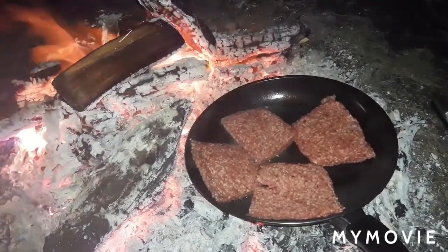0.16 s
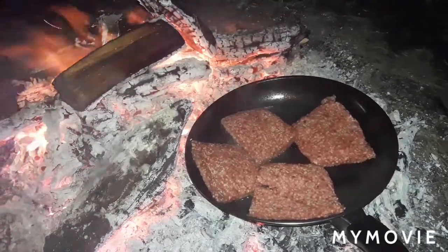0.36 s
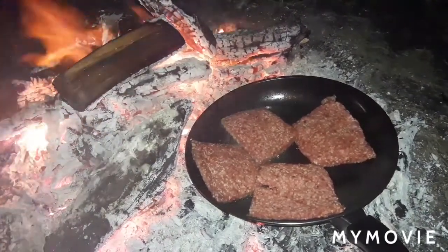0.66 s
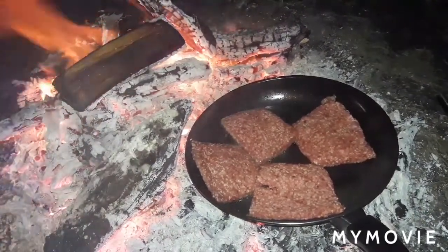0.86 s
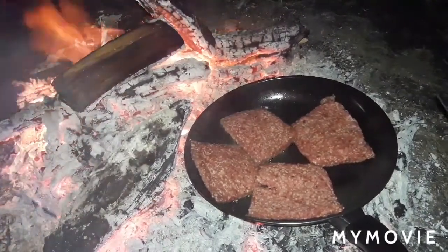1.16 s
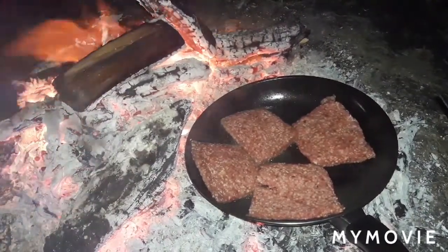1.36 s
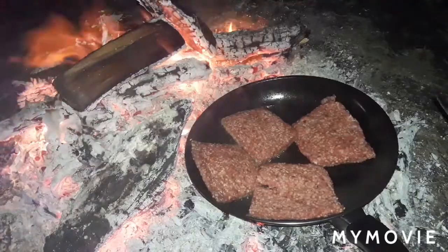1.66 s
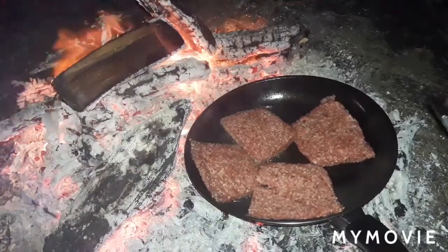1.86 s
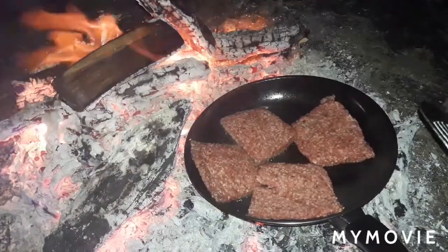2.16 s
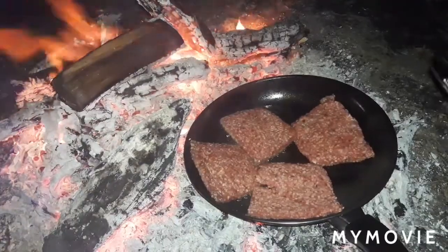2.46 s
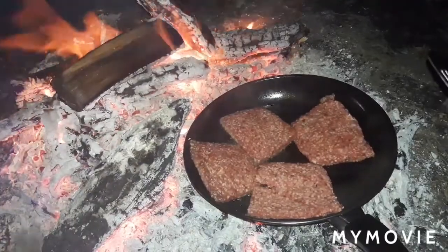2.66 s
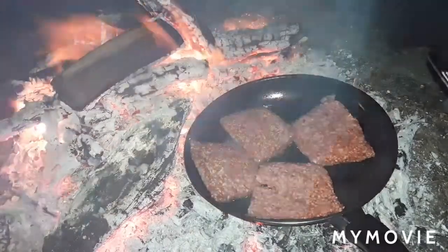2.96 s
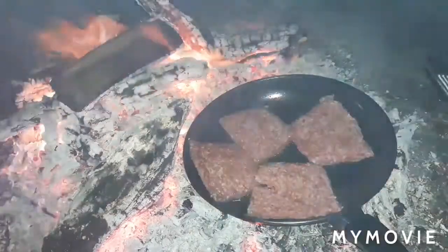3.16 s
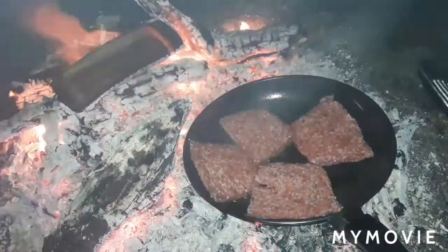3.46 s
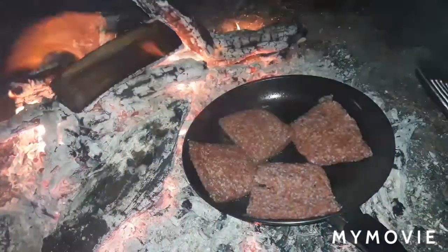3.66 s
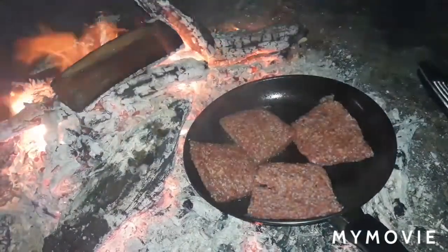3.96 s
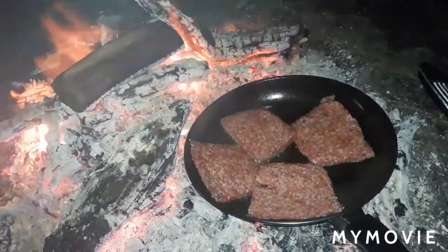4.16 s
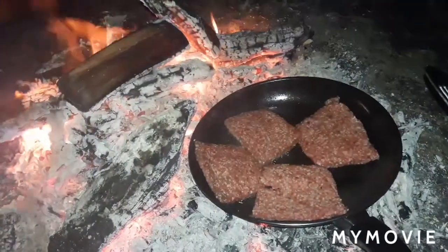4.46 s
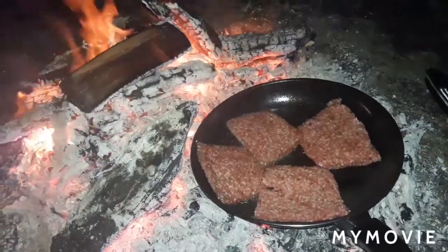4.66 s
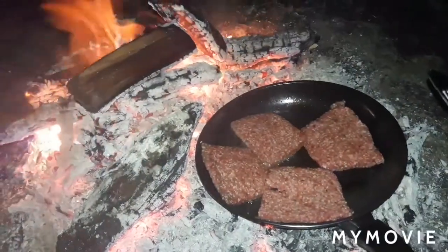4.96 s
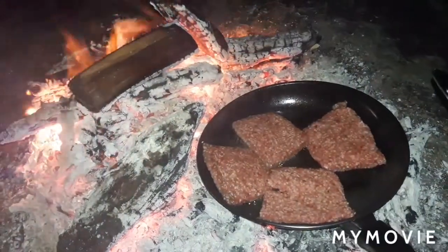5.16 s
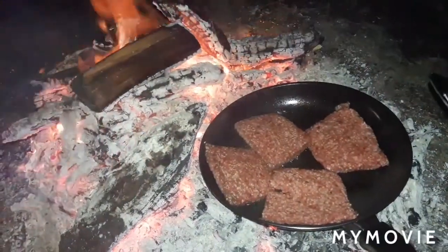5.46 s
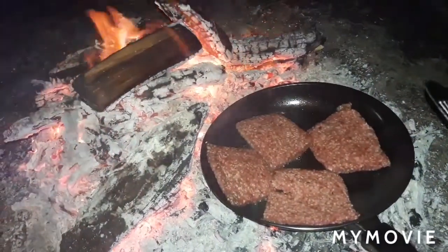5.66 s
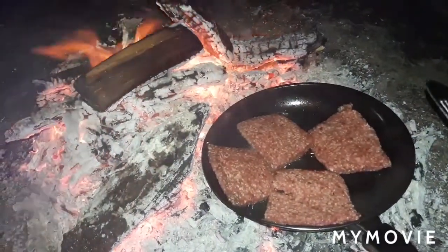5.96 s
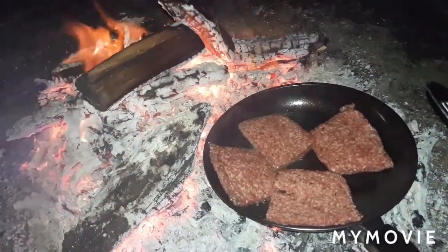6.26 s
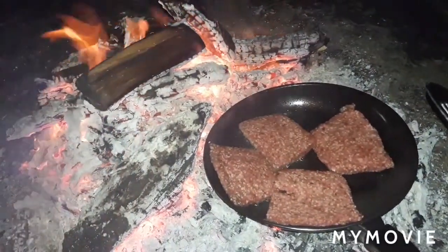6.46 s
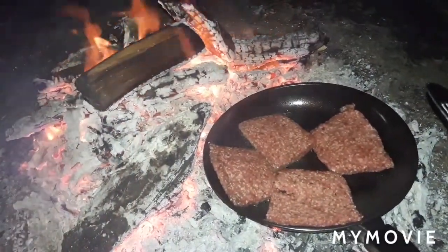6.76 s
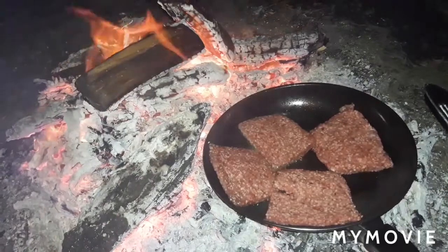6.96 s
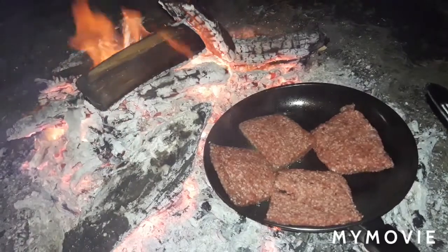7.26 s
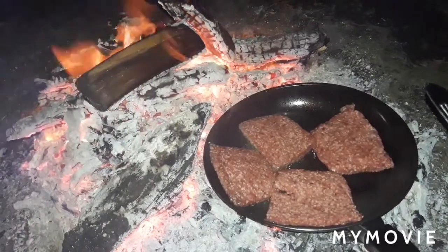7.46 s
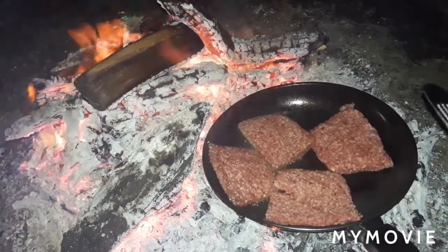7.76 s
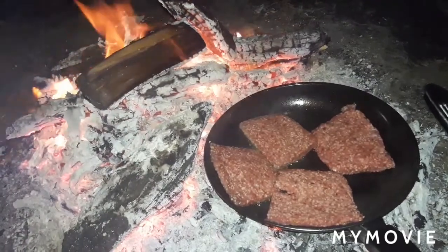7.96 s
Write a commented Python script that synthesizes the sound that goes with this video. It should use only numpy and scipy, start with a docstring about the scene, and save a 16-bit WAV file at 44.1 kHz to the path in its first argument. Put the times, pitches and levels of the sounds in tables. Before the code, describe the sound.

Meat slices sizzle in a pan on campfire embers, with sharp spitting pops and tiny ringing bubbles over a faint low rush of flames.

```python
"""Sharp spits and short rings: meat slices fry in a pan on campfire embers, close to a microphone.
Each steam bubble bursting in the fat is a noise snap (thud and spit) plus a rising sine, echoed by the pan.
Many small bursts and a fizz of patchy, gritty noise fill in behind.
Under them lie the rumble and soft rush of the flames, two bands of patchy noise; the bed's level drifts."""
import sys
import numpy as np
from scipy import signal
from scipy.fft import rfft, irfft, next_fast_len
from scipy.io import wavfile
from scipy.ndimage import uniform_filter1d

SR = 44100
rng = np.random.default_rng(int(sys.argv[2]) if len(sys.argv) > 2 else 0)


def dump(signal):
    """Clip the signal to [-1, 1] and save it as 16-bit WAV at the path in sys.argv[1]."""
    limited = np.clip(np.atleast_2d(signal).T, -1, 1)
    pcm = np.round(limited * 32767).astype(np.int16)
    wavfile.write(sys.argv[1], SR, pcm)


N = 357210


def amp(db):
    """Gain of a level in dB."""
    return 10 ** (np.asarray(db) / 20)


def unit(x):
    """x at rms 1."""
    return x / np.sqrt(np.mean(x ** 2) + 1e-20)


def along(points, hz):
    """Gain at hz, from (f/Hz, level/dB) points joined on a log-frequency axis."""
    f_hz, level_db = np.transpose(points)
    return amp(np.interp(np.log(hz + 1), np.log(f_hz + 1), level_db))


def filtered(x, response):
    """x times a zero-phase response of frequency."""
    size = next_fast_len(N + SR // 2)
    gain = response(np.fft.rfftfreq(size, 1 / SR))
    return irfft(rfft(x, size) * gain, size)[..., :N]


def causal(points, size=1024):
    """Minimum-phase impulse of this colour, envelope peak 1, by folding the cepstrum."""
    cepstrum = irfft(np.log(along(points, np.fft.rfftfreq(size, 1 / SR))))
    cepstrum[1:size // 2] *= 2
    cepstrum[size // 2 + 1:] = 0
    pulse = irfft(np.exp(rfft(cepstrum)))[:size // 2]
    return pulse / np.abs(signal.hilbert(pulse)).max()


def patchy(patchy_db):
    """White noise with time-frequency patches of random gain, patchy_db rms."""
    z = signal.stft(rng.standard_normal(N + 512), nperseg=512)[2]
    field = rng.standard_normal(z.shape)
    field = uniform_filter1d(field, size=8, axis=0)  # across frequency
    field = uniform_filter1d(field, size=10, axis=1)  # across time
    return signal.istft(z * amp(patchy_db * unit(field)), nperseg=512)[1][:N]


def laid(start_s, shapes):
    """Rows of short sounds summed at their times."""
    at = np.round(start_s * SR).astype(int)[:, None] + np.arange(shapes.shape[1])
    return np.bincount(at.ravel(), shapes.ravel(), N + SR)[:N]


# colour of the dull part of a snap: (f/Hz, relative level/dB)
THUD_COLOUR = [(400, -92.5), (1100, -2), (2200, -1), (4000, 9), (6500, 10.5), (8500, -105)]
# colour of the bright part of a snap: (f/Hz, relative level/dB)
SPIT_COLOUR = [(2500, -6), (5000, -14.5), (7300, 15.5), (8500, -1.5), (10000, 5), (12000, 9), (15500, 9.5),
               (16100, -73), (16800, -8)]


def bursts(start_s, ring_db, hz, thud_db, spit_db):
    """Each bubble snaps (a dull thud and a bright spit) and rings, its pitch rising as the film opens."""
    t = np.arange(SR // 50) / SR
    chance = rng.standard_normal((len(start_s), len(t) + 1))
    noise = chance[:, 1:]

    cycles = hz[:, None] * t
    wet = 1 / (1 + amp(spit_db - ring_db + 14.5))[:, None]  # 0 dry snap, 1 bubble deep in fat
    crest_cycles = (0.93 + 4.08 * wet) * amp(2.0 * chance[:, :1])  # wet bubbles bloom late and last
    bloom = cycles / crest_cycles * np.exp(1 - cycles / crest_cycles)
    wobble = 0.22 * np.cumsum(noise, axis=1)  # the cavity wobbles
    phase = 2 * np.pi * cycles * (1 + 12 * t) + wobble
    overtone = 0.24 * np.sin(2 * phase) * (hz[:, None] < 4200)  # big bubbles only
    tone = np.sin(phase) + overtone

    tear = amp(-60 * t / 0.0013)  # the film tears: -60 dB in 1.3 ms
    spray = amp(-9 + 3 * chance[:, -1:] - 60 * t / 0.01)  # weaker, -60 dB in 10 ms
    snap = noise * (tear + spray)
    snap[:, 0] = 5  # a sharp pressure step leads
    snap = snap / np.linalg.norm(snap, axis=1, keepdims=True)

    ring = laid(start_s, amp(ring_db)[:, None] * bloom * tone)
    thud = signal.fftconvolve(laid(start_s, amp(thud_db)[:, None] * snap), causal(THUD_COLOUR))
    spit = signal.fftconvolve(laid(start_s, amp(spit_db)[:, None] * snap), causal(SPIT_COLOUR))
    return ring + (thud + spit)[:N]


# echoes off the pan wall: (delay/s, level/dB)
RIM_ECHOES = [(.0009, -38), (.002, -22.5), (.0033, -18), (.005, -20.5)]


def pan(x):
    """The pan wall returns a few weak delayed copies."""
    echoes = [amp(db) * np.pad(x, (round(delay_s * SR), 0))[:N] for delay_s, db in RIM_ECHOES]
    return x + sum(echoes)


# loudest bursting bubbles: (t/s, ring level/dB, ring onset f/Hz, thud level/dB, spit level/dB)
LOUD_BUBBLES = [(0.0678, -26, 5300, -34, -19.5), (0.1207, -35, 2860, -25, -27),
                (0.1309, -27, 4930, -24, -21), (0.1911, -18, 6800, -31, -21), (0.201, -24, 6590, -37, -20),
                (0.2661, -16.5, 4720, -20, -19), (0.3538, -35, 7000, -39, -20),
                (0.4367, -35.5, 2950, -30, -40), (0.4429, -31, 4520, -46, -19.5),
                (0.5003, -30.5, 7140, -32, -26), (0.5191, -40, 6780, -40, -22.5),
                (0.533, -33.5, 2100, -27, -23.5), (0.6084, -33.5, 2880, -29, -25),
                (0.6569, -16.5, 6030, -38, -9.5), (0.701, -28, 7260, -34, -22),
                (0.7059, -36, 4000, -28, -39), (0.7409, -33, 3960, -23.5, -15.5),
                (0.7654, -34, 4840, -25, -43), (0.7692, -28.5, 4900, -36, -42),
                (0.9167, -42, 5280, -32, -29), (0.9546, -32, 5000, -43, -27),
                (0.991, -21.5, 4510, -43, -33), (1.0274, -36, 2110, -28, -31),
                (1.1133, -31.5, 5500, -41, -34), (1.1391, -29, 6030, -29, -32),
                (1.146, -43, 5400, -39, -31), (1.1514, -42, 4630, -41, -24),
                (1.1738, -29, 4200, -25.5, -29), (1.1956, -35.5, 4400, -34, -49),
                (1.2466, -42, 5280, -42, -25), (1.272, -39, 4970, -30.5, -29), (1.298, -36, 4000, -32, -27),
                (1.3153, -38, 4000, -29, -39), (1.3306, -32, 7000, -45, -44), (1.443, -42, 6630, -42, -28),
                (1.5646, -38.5, 1740, -29.5, -24), (1.6087, -59, 3250, -50, -26),
                (1.6622, -32, 2730, -33, -53), (1.7078, -39, 5060, -37, -26), (1.7461, -24, 6370, -36, -32),
                (1.7645, -29.5, 5000, -45, -50), (1.8098, -21, 4860, -27, -26.5),
                (1.842, -26.5, 4860, -31, -29), (1.8622, -35, 3270, -30, -36),
                (1.9293, -29.5, 7260, -40, -31), (2.051, -26, 4230, -23, -29),
                (2.0706, -36.5, 1810, -30, -42), (2.0903, -30.5, 4460, -28, -41),
                (2.1363, -27, 5000, -33, -22), (2.1485, -29.5, 3880, -27, -34),
                (2.1882, -28, 5200, -25.5, -15.5), (2.2259, -27, 6600, -29.5, -31),
                (2.3549, -21, 6600, -45, -41), (2.4358, -25, 7170, -42, -24), (2.451, -46, 4910, -47, -25),
                (2.4717, -27.5, 3330, -28, -48), (2.5521, -22.5, 6300, -24, -29),
                (2.5744, -34, 4000, -34, -19.5), (2.6018, -28.5, 2820, -21, -45),
                (2.6254, -28, 6070, -30, -25), (2.6582, -29, 5770, -31, -33), (2.6772, -17, 3900, -14, -21),
                (2.6809, -39, 4100, -15, -24), (2.6985, -23.5, 6830, -31, -45),
                (2.7035, -33, 5060, -33, -27), (2.7319, -38, 6860, -45, -18), (2.7873, -50, 2820, -43, -24),
                (2.8637, -41, 5450, -38, -24), (2.8904, -16.5, 5500, -20, -13),
                (2.893, -18, 5300, -38, -20), (2.8987, -37, 2840, -25, -19), (2.902, -13, 7300, -32, -19),
                (2.914, -20, 7100, -27, -21), (2.9502, -25.5, 7400, -36, -34), (2.955, -40, 7300, -29, -20),
                (2.9899, -24.5, 5220, -39, -31), (3.0042, -27.5, 5440, -34, -39),
                (3.0527, -31, 7300, -37, -51), (3.0621, -25.5, 4800, -30, -21.5),
                (3.0706, -27, 5900, -44, -40), (3.1305, -30, 5670, -32, -36), (3.2115, -43, 3500, -38, -46),
                (3.2708, -37, 5040, -36, -27), (3.3135, -35, 7240, -47, -34),
                (3.378, -38.5, 5300, -47, -54), (3.4722, -39, 4100, -34, -46),
                (3.5572, -34, 4500, -34, -36), (3.633, -53, 4870, -50, -32), (3.662, -38, 5530, -46, -32),
                (3.7773, -31, 6010, -45, -39), (3.798, -44, 6400, -52, -32),
                (3.8187, -30.5, 7400, -43, -51), (3.888, -37.5, 4500, -47, -54),
                (3.939, -37, 2120, -34, -35), (4.0865, -44, 3880, -38, -29.5),
                (4.0934, -38, 4950, -41, -39), (4.1121, -58, 3750, -50, -27),
                (4.1635, -28, 4900, -37, -18.5), (4.424, -47, 3190, -42, -28),
                (4.4363, -45, 5060, -43, -25), (4.5874, -29, 5900, -41, -46),
                (4.6364, -19.5, 7200, -29, -26), (4.7821, -39, 4970, -32, -24),
                (4.8069, -36, 6240, -33, -25), (4.8282, -16.5, 6460, -44, -35),
                (4.889, -21.5, 6100, -44, -46), (4.9588, -37, 2080, -38, -23), (4.964, -52, 3360, -47, -25),
                (4.989, -31.5, 2110, -25.5, -34), (5.0423, -19.5, 6700, -26, -27),
                (5.0546, -30, 4930, -38, -43), (5.112, -51, 4480, -39, -24), (5.1807, -41, 2540, -28, -24),
                (5.2504, -45, 2910, -37, -24), (5.2993, -37, 3150, -26, -33),
                (5.3067, -20, 5230, -24, -17.5), (5.3415, -27, 4500, -30, -30),
                (5.3591, -37, 4010, -33, -24), (5.4421, -44, 5100, -39, -33), (5.4508, -44, 4500, -45, -26),
                (5.4784, -39, 3860, -30, -24.5), (5.5341, -24.5, 6840, -36, -31),
                (5.5788, -24.5, 2360, -23, -33), (5.5948, -20.5, 5250, -21, -25),
                (5.619, -37, 5120, -38, -26), (5.626, -30, 6800, -32, -30), (5.633, -26, 5660, -31, -17.5),
                (5.652, -23, 5000, -20, -21), (5.7096, -26, 7060, -33, -28), (5.742, -28, 6700, -37, -26),
                (5.766, -50, 2520, -38, -26), (5.83, -25.5, 5570, -22, -31), (5.8716, -29, 4080, -36, -46),
                (5.9454, -31, 5160, -29, -27), (5.9834, -14.5, 4240, -11, -16.5),
                (6.0127, -26.5, 4670, -26, -42), (6.1152, -38, 3550, -38, -24),
                (6.2817, -16.5, 7100, -22.5, -24), (6.33, -31, 2200, -30, -32),
                (6.3672, -25, 6520, -37, -45), (6.4403, -28.5, 2380, -24.5, -51),
                (6.459, -28, 6300, -25, -44), (6.52, -26, 5040, -33, -34), (6.5285, -22.5, 4500, -28, -31),
                (6.547, -26, 7350, -35, -26), (6.5964, -19, 6300, -44, -24), (6.623, -56.5, 2280, -44, -26),
                (6.7282, -25, 7240, -29.5, -24), (6.8078, -47, 4870, -41, -25),
                (6.8495, -31, 5210, -34, -26), (6.8655, -34, 6240, -42, -22),
                (6.872, -34, 5990, -42, -21.5), (6.9742, -41, 3490, -44, -22), (6.994, -32, 5500, -28, -30),
                (7.063, -52, 3770, -41, -24), (7.1971, -28.5, 3740, -22, -24),
                (7.2058, -31, 3190, -33, -25), (7.2334, -44, 3490, -32, -20), (7.252, -26, 5400, -31, -16),
                (7.301, -22.5, 7150, -26, -18), (7.344, -44, 3500, -24.5, -27),
                (7.3954, -29.5, 4170, -26, -29), (7.5215, -33.5, 2770, -40, -45),
                (7.7546, -32, 3150, -26, -26), (7.777, -34.5, 3060, -27, -47),
                (7.7829, -27, 3170, -25, -24), (7.8157, -20, 5160, -33, -18), (7.8355, -31, 4040, -31, -33),
                (7.8596, -29, 3270, -18, -12), (7.9172, -20, 5650, -48, -38), (8.03, -34, 6540, -28, -28),
                (8.0835, -37, 4800, -20.5, -20.5), (8.0888, -31, 5030, -33, -25)]


def loud_bursts():
    """The loudest bubbles, each burst at its listed time, with pan echoes."""
    return pan(bursts(*np.transpose(LOUD_BUBBLES)))


THUD_DB, THUD_REF_HZ, THUD_DB_PER_OCTAVE = -4, 4850, 1  # thud over ring at THUD_REF_HZ, and slope
THUD_SCATTER_DB = 3
THUD_OF_SPIT_DB = -8.5  # a dry snap thuds too, this far under the bubble's level before dryness splits ring from spit


def thud_of(ring_db, hz, burst_level_db):
    """Small bubble's thud level: the greater of a share of its ring and a share of its snap, scattered."""
    deep_db = ring_db + THUD_DB + THUD_DB_PER_OCTAVE * np.log2(hz / THUD_REF_HZ)
    thud_db = np.maximum(deep_db, burst_level_db + THUD_OF_SPIT_DB)
    return thud_db + THUD_SCATTER_DB * rng.standard_normal(len(hz))


SMALL_COUNT = 1300
SMALL_DB, SMALL_TAIL_DB, SMALL_CAP = 2.5, 4.5, 0.71  # weakest over drift level; exponential tail, cut
SMALL_LOW_HZ, SMALL_HZ_RATIO = 2560, 3.88  # lowest ring onset; highest over lowest
DRY_DB = 10.5  # ring lost and spit gained by the driest


def small_bursts(fizz_db):
    """Small bubbles at random times: many weak, few strong, with pan echoes."""
    when, strength, pitch, dryness = rng.random((SMALL_COUNT, 4)).T
    start_s = when * N / SR
    level_db = fizz_db[(start_s * SR).astype(int)] + SMALL_DB
    level_db = level_db - SMALL_TAIL_DB * np.log(1 - SMALL_CAP * strength)
    ring_db = level_db - DRY_DB * dryness
    spit_db = level_db + DRY_DB * dryness
    hz = SMALL_LOW_HZ * SMALL_HZ_RATIO ** pitch
    thud_db = thud_of(ring_db, hz, level_db)
    return pan(bursts(start_s, ring_db, hz, thud_db, spit_db))


# colour of the fizz: (f/Hz, relative level/dB)
FIZZ_COLOUR = [(400, -68), (1000, -10.5), (2000, -8), (4000, -3), (6400, 0), (7300, 1.5), (7800, -7),
               (8500, -13.5), (10000, -10.5), (12000, -8), (16000, -6)]


def fizz(fizz_db):
    """The countless smallest bubbles merge into patchy, gritty noise."""
    grit = 1 + 0.24 * rng.exponential(size=N // 64 + 1).repeat(64)[:N]  # new gain each 1.45 ms
    noise = unit(filtered(grit * patchy(patchy_db=1.28), lambda hz: along(FIZZ_COLOUR, hz)))
    return amp(fizz_db - 1.82) * noise


FIZZ_TOP_HZ = 15850


def frying(fizz_db):
    """Loud bursts over a band-limited bed of small bursts and fizz."""
    bed = filtered(small_bursts(fizz_db) + fizz(fizz_db), lambda hz: hz < FIZZ_TOP_HZ)
    return loud_bursts() + bed


# colour of the flames' low rumble: (f/Hz, relative level/dB)
RUMBLE_COLOUR = [(25, -66), (42, -8.5), (80, 4), (118, 7), (200, 2.5), (330, -24), (700, -88)]
# colour of the flames' soft rush: (f/Hz, relative level/dB)
RUSH_COLOUR = [(130, -18), (250, -2.5), (530, -1.5), (950, -5.5), (1200, -11.5), (1800, -17.5), (3000, -22),
               (6000, -100)]


def flames(rumble_db, rush_db):
    """Turbulent burning gas: a low rumble and a soft rush."""
    rumble = unit(filtered(patchy(patchy_db=1.04), lambda hz: along(RUMBLE_COLOUR, hz)))
    rush = unit(filtered(patchy(patchy_db=1.18), lambda hz: along(RUSH_COLOUR, hz)))
    return amp(rumble_db) * rumble + amp(rush_db) * rush


RUMBLE_DB = -10  # re drift level of the fizz, which it follows
# drift of the bed: (t/s, reference level of small bursts, fizz and rumble/dB, flame rush level/dB)
DRIFT_LEVELS = [(0, -44.5, -54), (0.4, -48.5, -55), (0.65, -47.5, -54.5), (1.05, -51, -60), (1.6, -51, -59),
                (2.4, -46.5, -55.5), (2.8, -47, -50.5), (3.03, -48.5, -53.5), (3.15, -53.5, -58.5),
                (3.45, -56, -63), (4.03, -55.5, -64), (4.15, -49.5, -57), (4.7, -45, -50.5),
                (5.7, -44, -50), (6.3, -44.5, -50.5), (6.75, -45, -51), (7.2, -45.5, -52.5),
                (7.5, -46.5, -54.5), (8.1, -47.5, -55)]


def scene():
    """Pan and fire at one microphone."""
    point_s, *levels = np.transpose(DRIFT_LEVELS)
    t = np.arange(N) / SR
    fizz_db, rush_db = [np.interp(t, point_s, level_db) for level_db in levels]
    return (frying(fizz_db) + flames(fizz_db + RUMBLE_DB, rush_db))[None]


TOP_HZ = 16800


def record(dry):
    """Nothing is kept above the band limit."""
    return filtered(dry, lambda hz: hz < TOP_HZ)


dry = scene()
out = record(dry)
dump(out)
```